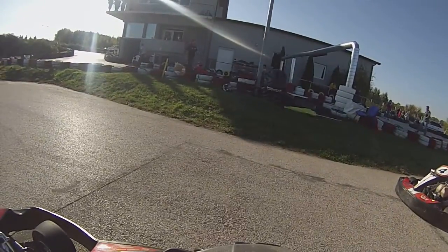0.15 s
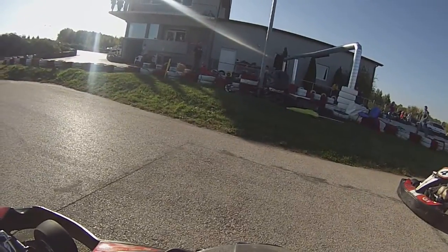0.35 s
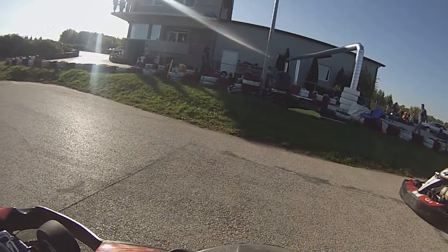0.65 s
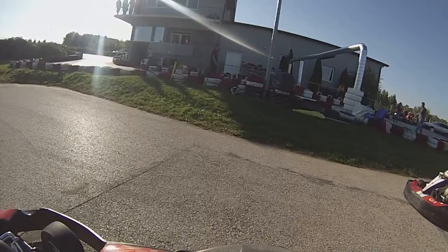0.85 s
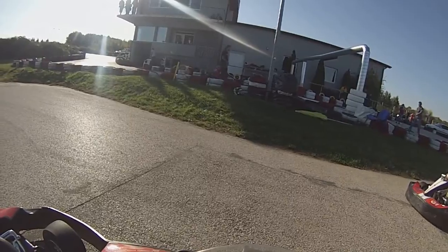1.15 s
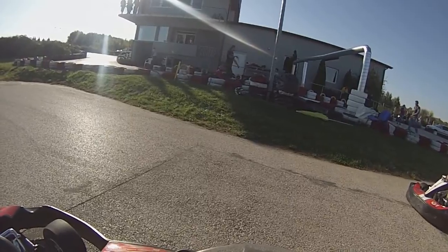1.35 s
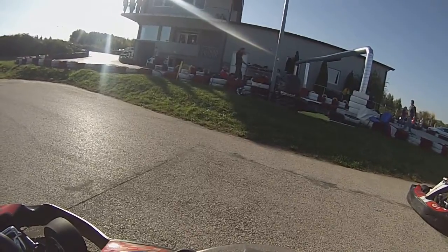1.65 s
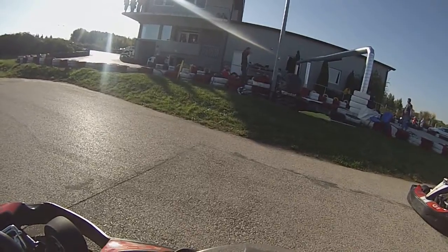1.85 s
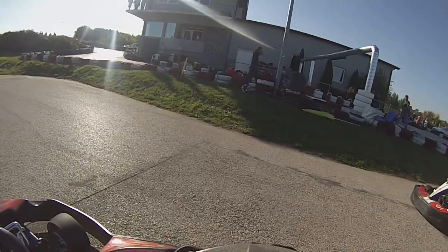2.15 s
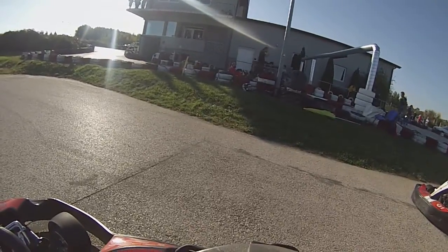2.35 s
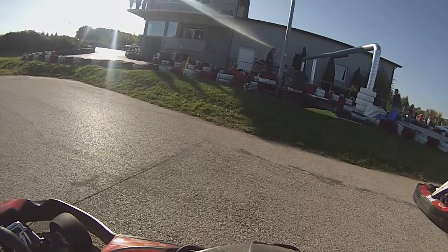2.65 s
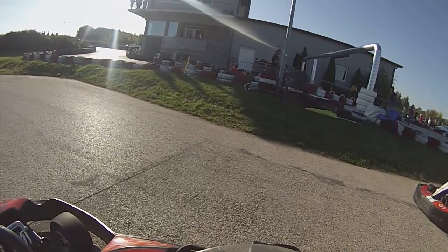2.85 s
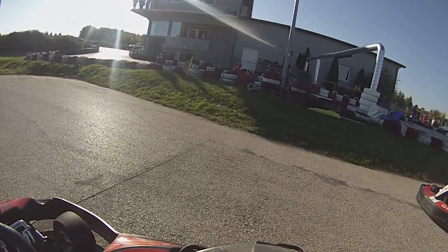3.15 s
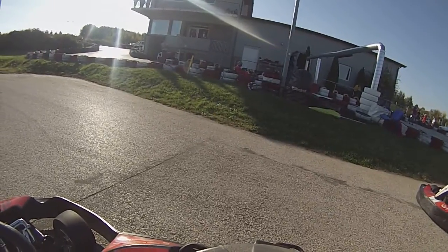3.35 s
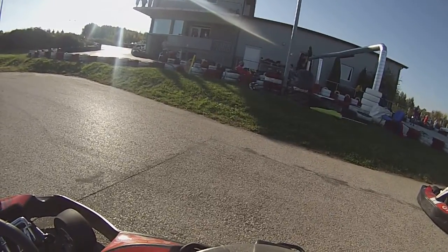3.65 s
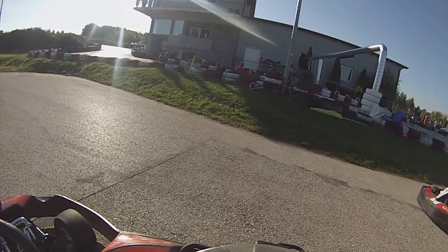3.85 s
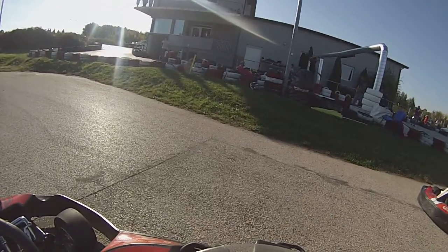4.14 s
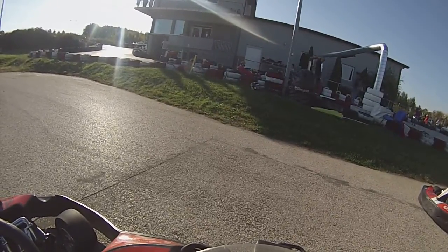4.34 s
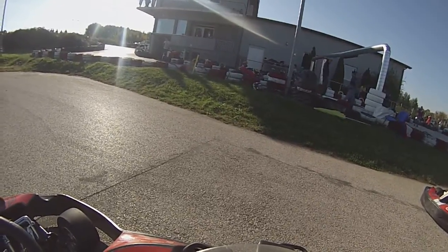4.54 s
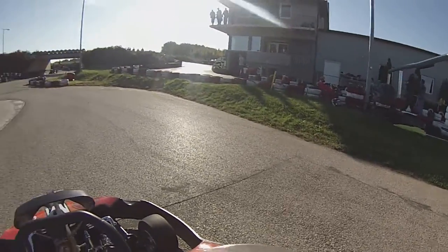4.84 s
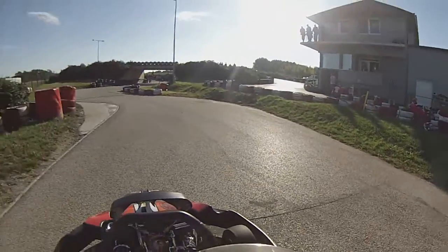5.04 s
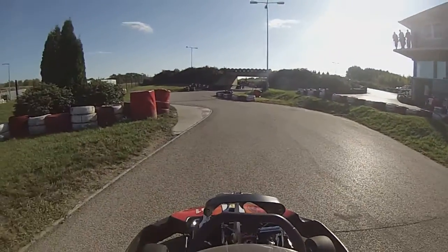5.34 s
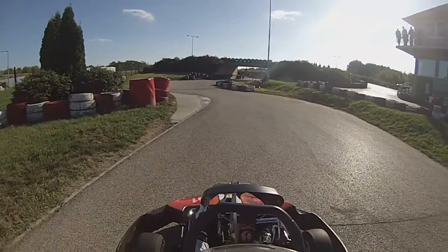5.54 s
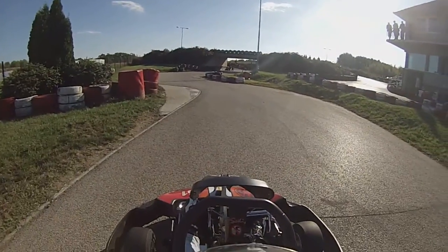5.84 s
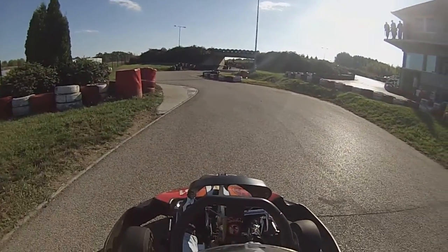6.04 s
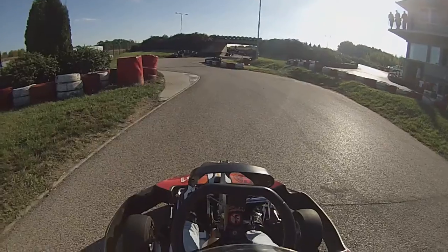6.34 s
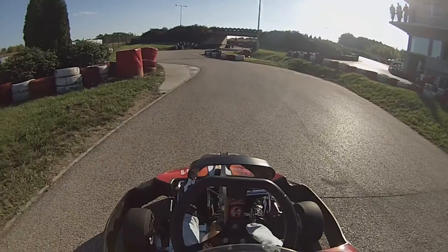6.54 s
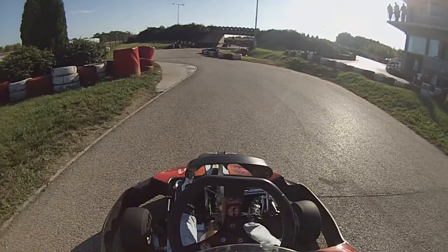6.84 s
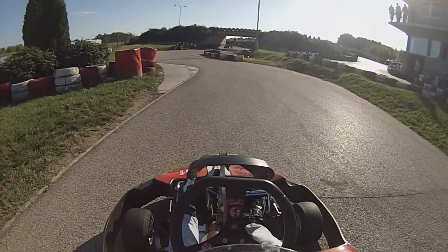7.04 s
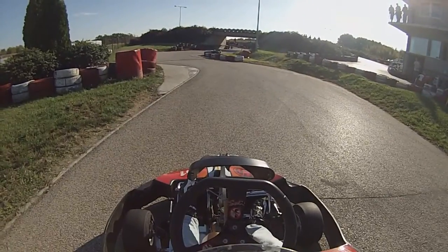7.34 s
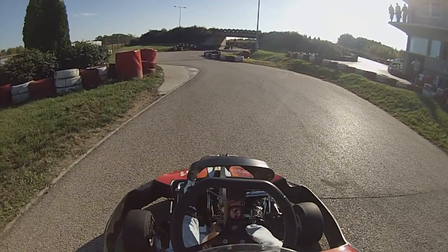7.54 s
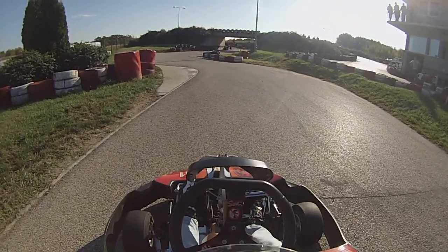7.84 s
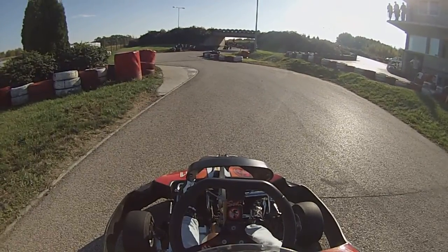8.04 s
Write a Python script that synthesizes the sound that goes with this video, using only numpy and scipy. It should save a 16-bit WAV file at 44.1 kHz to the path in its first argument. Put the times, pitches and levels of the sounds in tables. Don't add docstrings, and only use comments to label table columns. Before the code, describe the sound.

Close rattly kart idle: rapid low thumps, ringing mechanical ticks and airy fan whirr, with faint bracket tinks and distant engine drone.

```python
import sys
import numpy as np
from scipy import signal
from scipy.fft import rfft, irfft, next_fast_len
from scipy.io import wavfile

SR = 44100
rng = np.random.default_rng(int(sys.argv[2]) if len(sys.argv) > 2 else 0)


def field_ratio(decibels):
    return 10 ** (np.asarray(decibels, dtype=float) / 20)


def generate_wav(sig):
    pcm = np.round(np.clip(np.atleast_2d(sig).T, -1, 1) * 32767).astype(np.int16)
    wavfile.write(sys.argv[1], SR, pcm)


N = 361179
TIME_S = np.arange(N) / SR


def ring(clicks, hz, t60_s):
    radius = field_ratio(-60 / (t60_s * SR))
    angle = 2 * np.pi * hz / SR
    return signal.lfilter([0, np.sin(angle)], [1, -2 * radius * np.cos(angle), radius ** 2], clicks + 1e-18)


def resonance(x, hz, width_hz):
    radius = np.exp(-np.pi * width_hz / SR)
    feed = np.array([1, 0, -1]) * (1 - radius ** 2) / 2
    feedback = [1, -2 * radius * np.cos(2 * np.pi * hz / SR), radius ** 2]
    return signal.lfilter(feed, feedback, x)


def rms_one(x):
    return x / np.sqrt(np.mean(x ** 2) + 1e-20)


def in_time(rows):
    seconds, *columns = np.transpose(rows)
    return [np.interp(TIME_S, seconds, column) for column in columns]


def at_hz(hz_points, values, hz):
    return np.interp(np.log(hz), np.log(hz_points), values)


def coloured_noise(spectrum):
    size = next_fast_len(N)
    hz = np.arange(size // 2 + 1) * SR / size + 1
    gain = field_ratio(at_hz(*np.transpose(spectrum), hz))
    return rms_one(irfft(rfft(rng.standard_normal(size)) * gain, size)[:N])


def drift(hz):
    return coloured_noise([(hz / 10, 0), (hz, 0), (10 * hz, -40), (100 * hz, -120)])


def swells(rows):
    return [(height, 1 / (1 + ((TIME_S - centre_s) / half_s) ** 2)) for centre_s, half_s, height in rows]


def moments(cycle, shares, jitter_s):
    due = np.arange(-1, int(cycle[-1]) + 1)[:, None] + np.asarray(shares)
    at = np.interp(due, cycle, np.arange(N), left=-SR, right=N + SR)
    at = np.round(at + jitter_s * SR * rng.standard_normal(due.shape))
    return np.clip(at, -1, N).astype(int) + 1


def click_train(at, sizes):
    sizes = np.broadcast_to(sizes, at.shape)
    return np.bincount(at.ravel(), sizes.ravel(), N + 2)[1:-1]


# time in seconds, speed in turns per second.
CRANK_SPEED = [(0.0, 28.631), (0.4, 27.938), (2.2, 27.637), (3.4, 27.712), (3.6, 28.169), (4.6, 28.06),
               (5.0, 27.122), (5.6, 26.435), (6.6, 27.452), (7.4, 27.949), (8.19, 27.512)]


def crank():
    turns_per_s, = in_time(CRANK_SPEED)
    cycle = 0.109 + np.cumsum(turns_per_s) / (2 * SR)
    sag = np.maximum(27.7 - turns_per_s, 0)
    return cycle, sag


# time in seconds, share of the turn from aside (0) to ahead (1).
HEAD_TURN = [
    (0, 0),
    (4.65, 0.27),
    (5.15, 1),
    (8.19, 0.81),
]


def head_turn():
    ahead, = in_time(HEAD_TURN)
    return ahead


# share of the cycle, level in dB.
EXHAUST_PUFFS = [
    (0.597, -10.5),
    (.788, -4),
    (0.842, -5.5),
]
# pitch in Hz, level in dB, time to fall 60 dB in seconds.
SILENCER_MODES = [(92.8, -16, 0.075), (107.8, -11.5, 0.027), (177.9, -26, 0.045), (274, -43, 0.017)]
SILENCER_SIGNS = [-1, 1, -1, -1]
# swings per cycle, share of the cycle at a crest, level in dB.
PIPE_TONES = [(6, .078, -6), (12, -.011, -10), (14, -.018, -16)]


def exhaust(cycle, ahead, sag):
    shares, puff_db = np.transpose(EXHAUST_PUFFS)
    at = moments(cycle, shares, jitter_s=0.0001)
    puffs = click_train(at, field_ratio(puff_db + 0.45 * rng.standard_normal(at.shape)))
    sound = np.zeros(N)
    for sign, (hz, db, t60_s) in zip(SILENCER_SIGNS, SILENCER_MODES):
        sound += sign * field_ratio(db) * ring(puffs, hz, t60_s)
    for swings, crest, db in PIPE_TONES:
        sound += field_ratio(-48.5 + db) * np.cos(2 * np.pi * swings * (cycle - crest))
    aside_db, ahead_db, db_per_sag = 1.26, -1.5, -0.9
    return field_ratio(aside_db + ahead * (ahead_db - aside_db) + db_per_sag * sag) * sound


# time in seconds, heave in dB, rocking in dB.
HELMET_GRIP = [(0, -3, -1.5), (1.1, -2, -0.5), (1.6, -1, 2), (2.1, -2, 0.5), (3, 0, -0.5), (3.7, 1.5, -1.5),
               (3.92, -1, -1), (4.05, 1.5, 1), (4.5, -0.5, 1), (4.75, -2, -2.5), (5.4, -8.5, 3),
               (5.8, 2, 2.5), (6.05, 3.5, -1.5), (6.2, -0.5, -0.5), (6.5, 4, -6.5), (6.8, 5, -0.5),
               (7.4, 4, 2.5), (8.19, 4.5, 1)]
SHAKE_TIMING = [(2, .376, .361), (4, .208, .222), (3, .10, .18), (7, .09, .08), (1, .87, .38)]
# dB aside, dB ahead, share of the heave, share of the rocking,
# dB per turn per second of sag.
SHAKE_LEVELS = [(-32, -32, 1, 0.2, -0.5), (-36, -35.5, 0.079, 0.82, -6.5), (-44.5, -42.5, 0.55, -0.35, -1),
                (-53, -54.5, 0.0031, -0.89, 11.5), (-56, -56, 0.13, -.2, -3)]


def shake(cycle, ahead, sag):
    heave_db, rocking_db = in_time(HELMET_GRIP)
    wander_db = 0.7 * drift(4)
    sound = np.zeros(N)
    for timing, levels in zip(SHAKE_TIMING, SHAKE_LEVELS):
        swings, aside_crest, ahead_crest = timing
        aside_db, ahead_db, heave_share, rocking_share, db_per_sag = levels
        crest = aside_crest + ahead * (ahead_crest - aside_crest)
        level_db = aside_db + ahead * (ahead_db - aside_db)
        level_db = level_db + heave_share * heave_db + rocking_share * rocking_db
        level_db = level_db + db_per_sag * sag + wander_db
        sound += np.sqrt(2) * field_ratio(level_db) * np.cos(2 * np.pi * swings * (cycle - crest))
    return sound


KNOCK_TICK_HZ = [2000, 4200]


def valve_gear(cycle, contacts, modes):
    contacts = np.array(contacts)
    at = moments(cycle, contacts[:, 0], jitter_s=0.00005)
    rattle = click_train(at, field_ratio(2 * contacts[:, 2]))
    rattle = signal.lfilter([1], [1, -np.exp(-1 / (0.03 * SR))], rattle)
    rattle = rattle / rattle.mean()
    loose = field_ratio(-5) * rng.standard_normal(N)
    sound = np.zeros(N)
    for hz, width_hz, db in modes:
        reach_db = [1.2 * at_hz(KNOCK_TICK_HZ, knock_tick_db, hz) for knock_tick_db in contacts[:, 1:]]
        sizes = field_ratio(reach_db + 2.0 * rng.standard_normal(at.shape))
        sizes = rng.choice([-1, 1], len(contacts)) * sizes
        pulsed = np.clip(hz / 6500, 0.12, 0.8)
        drive = rms_one(click_train(at, sizes)) + loose * np.sqrt(1 - pulsed + pulsed * rattle)
        peak = resonance(drive, hz, 0.8 * width_hz)
        sound += field_ratio(db) * resonance(peak, hz, 2.54 * width_hz)
    return field_ratio(-45) * rms_one(sound)


# share of the cycle, knock in dB, tick in dB.
CONTACTS_ASIDE = [(.01, -4, 7), (.045, 1, 0), (.08, -2, -1), (.125, 2, -3), (.165, -2, -2), (.2, 3, -2),
                  (.24, -3, -4), (.315, 1, -3), (.415, 1, -8), (.585, -2, -4), (.685, -3, -4),
                  (.745, -2, -8), (.805, -1, -9), (.925, 1, -7), (.98, -2, -1)]
# share of the cycle, knock in dB, tick in dB.
CONTACTS_AHEAD = [(.025, 0, 3), (.055, -3, 1), (.09, 1, 3), (.165, 2, -1), (.25, -2, -5), (.285, 3, -1),
                  (.39, -2, -4), (.485, -1, -6), (.57, -5, -3), (.665, 0, -2), (.79, -1, -4), (.86, -3, -5),
                  (.925, 1, -4), (.98, -3, -2)]
# pitch in Hz, width in Hz, dB aside, dB ahead.
CASE_MODES = [(264.4, 21, -4, -15), (312.3, 31, -6.5, -5), (377, 40.5, -6.5, -7), (448, 77, -16.5, -13.5),
              (556, 44, -12.5, -11.5), (760, 24.3, -4, -5), (861, 108, -11.5, -12), (1164, 50, -4.5, -0.5),
              (1241.4, 55, 1.5, 3.5), (1303.5, 73, -3.5, 6), (1366, 73, 3.5, 4.5), (1443, 93, 1, 0.5),
              (1580, 125, -5, -13), (1685, 18, -15, -18), (1836, 450, -34, -22), (2058, 190, -6.5, -10),
              (2127, 105, -14, -4), (2270, 48, -7.5, -5.5), (2527, 170, -15.5, -14.5),
              (2820, 210, -19, -22), (3130, 190, -20, -24), (3606, 127, -25, -17), (3900, 145, -30, -19),
              (4260, 240, -35, -34), (4780, 370, -38, -30.5), (5400, 140, -30.5, -30.5),
              (5910, 1200, -35.5, -38), (6710, 200, -29.5, -57), (6970, 650, -32.5, -52)]


def clatter(cycle, ahead, sag):
    modes = np.array(CASE_MODES)
    aside_sound = valve_gear(cycle, CONTACTS_ASIDE, modes[:, [0, 1, 2]])
    ahead_sound = valve_gear(cycle, CONTACTS_AHEAD, modes[:, [0, 1, 3]])
    sound = np.cos(np.pi / 2 * ahead) * aside_sound + np.sin(np.pi / 2 * ahead) * ahead_sound
    sag_band = resonance(sound, 1150, width_hz=73)
    return sound + 0.64 * sag * sag_band


# pitch in Hz, level in dB per Hz.
WHIRR_SPECTRUM = [(150, -15), (230, -13), (320, -16), (640, -21.5), (1000, -20.5), (1350, -8), (2200, -23),
                  (2750, -28.5), (4200, -34), (6300, -38), (8000, -44.5), (12000, -50.5), (13500, -53.5),
                  (15000, -61)]


def whirr(cycle):
    once_db = 0.5 * np.cos(2 * np.pi * (cycle - 0.1))
    twice_db = 0.77 * np.cos(4 * np.pi * (cycle - 0.12))
    return field_ratio(-49 + once_db + twice_db) * coloured_noise(WHIRR_SPECTRUM)


# pitch in Hz, level in dB per Hz.
RUMBLE_SPECTRUM = [(4, -27), (9, -19), (15, -28), (40, -1.5), (100, -2.5), (170, -13), (220, -26),
                   (300, -50), (600, -120)]
# centre in seconds, half length in seconds, dB over the steady wobble.
NODS = [
    (4.722, 0.065, 7),
    (5.553, .05, 4),
    (6.2, 0.054, 6),
]


def helmet_wobble():
    nod_db = sum(db * hump for db, hump in swells(NODS))
    return field_ratio(-51 + nod_db + 1.5 * drift(3.7)) * coloured_noise(RUMBLE_SPECTRUM)


# peak in seconds, half length in seconds, level in dB.
DRONE_SWELLS = [
    (0.706, 0.51, -59),
    (4.727, 0.079, -59.5),
    (6.415, 0.097, -58),
    (7.503, 0.17, -54),
    (8.15, 0.066, -58),
]


def far_engines():
    drone = resonance(rng.standard_normal(N), 281, width_hz=61)
    drone = resonance(drone, 272, width_hz=87)
    level = field_ratio(-67) + sum(field_ratio(db) * hump for db, hump in swells(DRONE_SWELLS))
    return rms_one(drone) * level


# start in seconds, pitch in Hz, level in dB.
TINKS = [
    (5.642, 2580, -62),
    (5.655, 2620, -44),
    (7.598, 3420, -51),
    (7.638, 3480, -48),
    (7.672, 3200, -55),
]


def tinks():
    sound = np.zeros(N)
    for start_s, hz, db in TINKS:
        click = click_train(np.array([round(start_s * SR)]), 0.84)
        sound += field_ratio(db) * ring(click, hz, t60_s=0.051)
    return sound


def scene():
    cycle, sag = crank()
    ahead = head_turn()
    engine = exhaust(cycle, ahead, sag) + shake(cycle, ahead, sag)
    engine = engine + clatter(cycle, ahead, sag) + whirr(cycle)
    return (engine + helmet_wobble() + far_engines() + tinks())[None]


def band_limit(x):
    return signal.sosfilt(signal.butter(12, 14970, fs=SR, output="sos"), x)


def record(dry):
    mix = dry - dry.mean()
    return band_limit(mix)


dry = scene()
out = record(dry)
generate_wav(out)
```